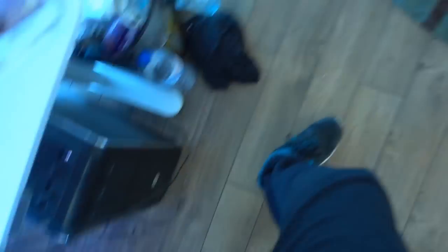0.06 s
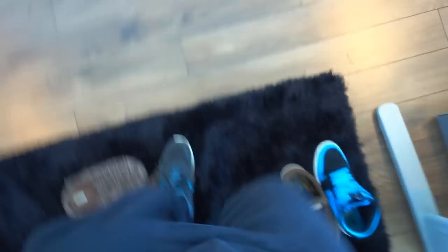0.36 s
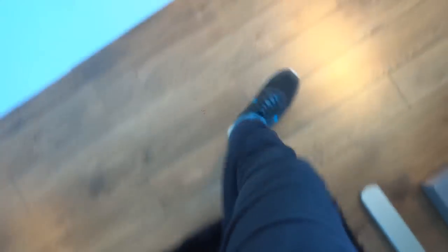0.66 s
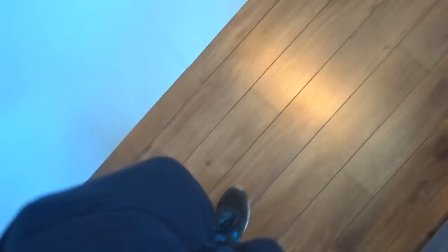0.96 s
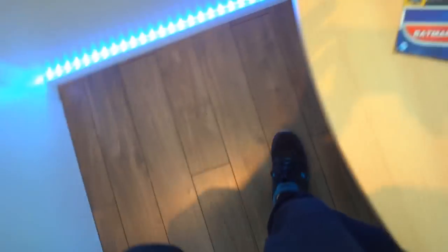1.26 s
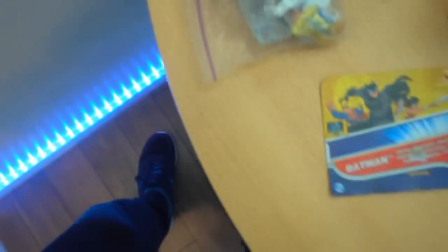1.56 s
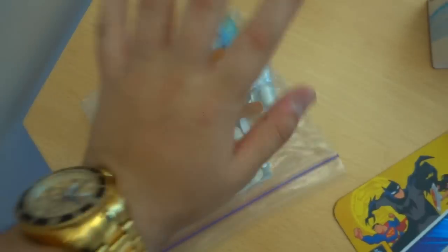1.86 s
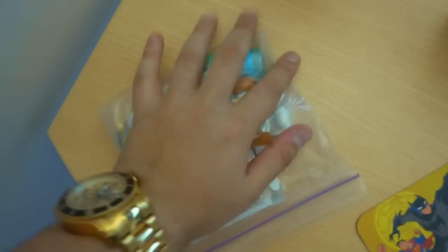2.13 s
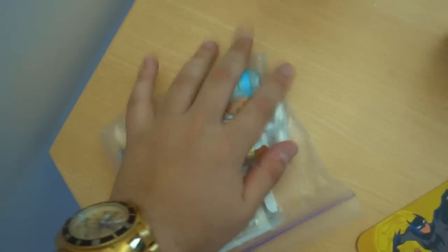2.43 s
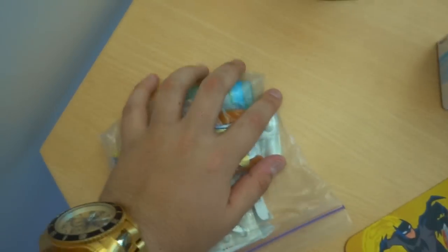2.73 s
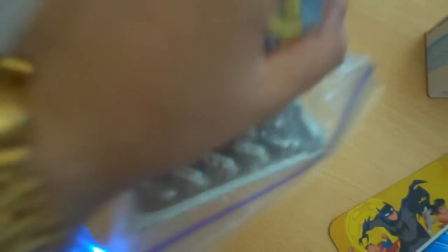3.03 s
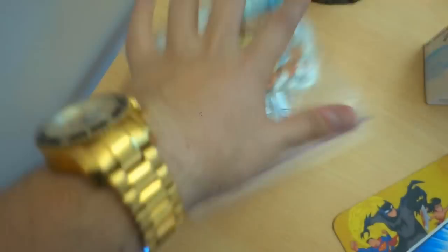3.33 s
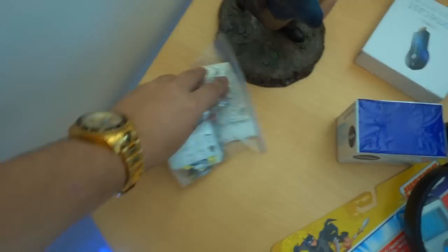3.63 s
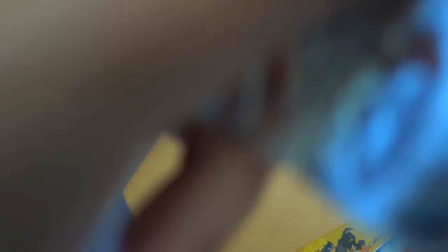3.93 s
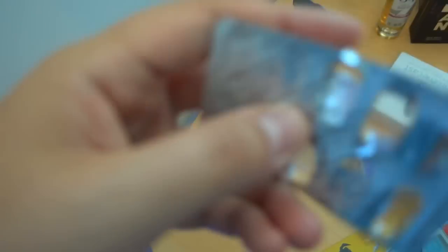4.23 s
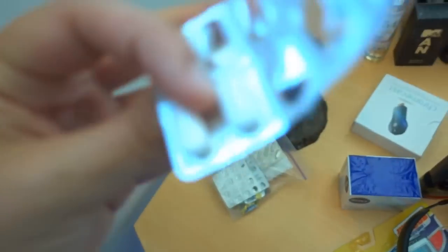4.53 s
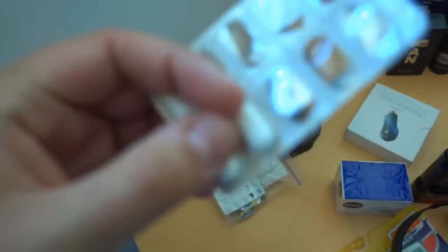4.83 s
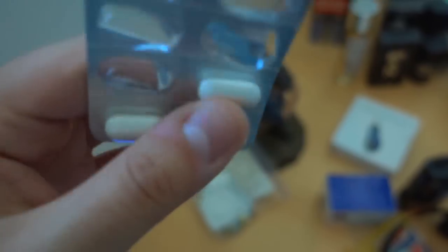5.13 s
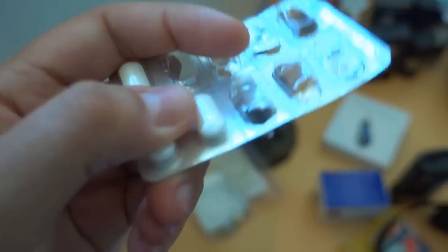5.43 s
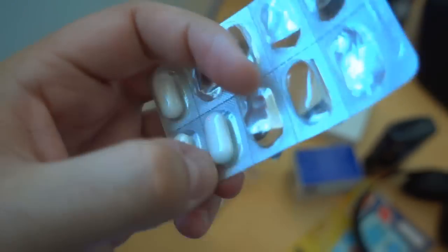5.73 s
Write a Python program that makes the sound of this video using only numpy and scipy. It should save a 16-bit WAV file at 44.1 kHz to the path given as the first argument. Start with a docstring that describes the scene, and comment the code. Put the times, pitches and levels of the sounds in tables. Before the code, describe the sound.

A blister strip of tablets crackles and clicks in someone's fingers, close to the microphone and a little to the left. Before that come a few footsteps on floorboards with rustling trousers, further away, followed by a thin plastic bag being crumpled and dragged on a desk, with low thumps and strips clattering inside. The room is small, with a faint low hush underneath.

```python
"""A blister strip of tablets, turned in the fingers close to a stereo microphone in a small room.
First, further off, shoes cross a wooden floor to a desk: heels thud, soles slap, trousers swish.
A hand paws at a plastic bag of medicine strips; the film crinkles and the desk top booms under it.
Then one strip is pulled out and held near, a little to the left: fingers scrape over the foil,
tablets rattle, and stiff folds and blisters snap through."""
import sys
import numpy as np
from scipy import signal
from scipy.fft import rfft, irfft, next_fast_len
from scipy.io import wavfile
from scipy.ndimage import uniform_filter1d

SR = 44100
rng = np.random.default_rng(int(sys.argv[2]) if len(sys.argv) > 2 else 0)


def inscribe(sig):
    """Save sig as 16-bit PCM at rate SR to the path in sys.argv[1].

    A 1-D sig is mono; a 2-D sig holds one channel per row.
    Samples are clipped to [-1, 1] before scaling.
    """
    pcm = np.round(np.clip(np.atleast_2d(sig).T, -1, 1) * 32767)
    wavfile.write(sys.argv[1], SR, pcm.astype(np.int16))


N = 255118


def amp(db):
    """Decibels to gain."""
    return 10 ** (np.asarray(db) / 20)


def unit(x):
    """Scales to rms 1."""
    return x / np.sqrt(np.mean(x ** 2) + 1e-20)


def read(points, hz):
    """Reads a curve on a log-frequency axis."""
    f, value = np.transpose(points)
    return np.interp(np.log(hz + 1), np.log(f + 1), value)


def clock(length=N):
    """Time of every sample in seconds."""
    return np.arange(length) / SR


def decay(t, t60):
    """Falls by 60 dB in t60 seconds."""
    return np.exp(-np.log(1000) * t / t60)


def add(mix, s, sound):
    """Mixes a sound in at time s."""
    part = mix[:, max(round(s * SR), 0):][:, :sound.shape[1]]
    part += sound[:, :part.shape[1]]


def gain_curves(rows, fade_s=0.011):
    """One gain curve per level column of (t/s, level/dB, ...), silent outside the rows' span."""
    s, *columns = np.transpose(rows)
    gate = np.interp(clock(), [s[0] - fade_s, s[0], s[-1], s[-1] + fade_s], [0, 1, 1, 0])
    return [gate * amp(np.interp(clock(), s, db)) for db in columns]


def stroke(db, rise_s, t60):
    """Envelope that builds up and dies away."""
    t = clock(SR // 2)
    return amp(db) * np.minimum(t / rise_s, 1) * decay(np.maximum(t - rise_s, 0), t60)


def swells(starts, dbs, rises, t60s):
    """Joint envelope of many strokes; a single number holds for all of them."""
    power = np.zeros((1, N))
    for s, *row in zip(*np.broadcast_arrays(starts, dbs, rises, t60s)):
        add(power, s, stroke(*row)[None] ** 2)
    return np.sqrt(power[0])


def steady(x, span_s=0.0114):
    """Holds the short-time power steady, so that a blow's envelope alone sets its strength."""
    power = uniform_filter1d((x ** 2).mean(0), int(span_s * SR) + 1)
    return x / np.sqrt(power.clip(1e-9))


def ring(modes):
    """Dying modes of a struck thing, alike in both channels."""
    t = clock(SR)
    sound = sum(amp(db) * decay(t, t60) * np.sin(2 * np.pi * hz * t) for hz, db, t60 in modes)
    return np.array([sound, sound])


# Stereo width at the microphone: f/Hz, side over mid/dB
WIDTH = [(60, -21), (125, -19), (250, -19), (500, -16), (1000, -11), (2000, -11), (4000, -5), (8000, -2.5),
         (11000, -1.5)]


def colour(pair, spectrum):
    """Shapes mid and side to a spectrum; left and right differ more in the treble."""
    size = next_fast_len(pair.shape[1])
    hz = np.fft.rfftfreq(size, 1 / SR)
    mid, side = rfft(pair, size) * amp(read(spectrum, hz))
    side = side * amp(read(WIDTH, hz))
    return unit(irfft([mid + side, mid - side], size)[:, :pair.shape[1]])


def noise(spectrum, length=N):
    """Smooth stereo noise."""
    return colour(rng.standard_normal((2, length)), spectrum)


def crackle(spectrum, per_s, spread_db, ring_s, bed_db, kinds=32):
    """Countless tiny clicks over a bed of noise; each kind rings in its own way, and a few are large."""
    t = clock(256)
    sizes = amp(spread_db * np.minimum(rng.exponential(1, N), 3)) * rng.choice([-1, 1], N)
    at = np.flatnonzero(rng.random(N) < per_s / SR)
    kind = rng.integers(0, kinds, N)
    rings = rng.standard_normal((kinds, 2, len(t))) * np.exp(-t / ring_s)
    clicks = np.zeros((2, N + len(t)))
    for k in range(len(t)):
        clicks[:, at + k] += sizes[at] * rings[kind[at], :, k].T
    bed = amp(bed_db) * rng.standard_normal((2, N))
    return colour(unit(clicks[:, :N]) + bed, spectrum)


# Reverberation of the small room: f/Hz, t60/s
ROOM_DECAY = [(125, 0.37), (500, 0.2), (2000, 0.42), (5000, 0.31), (11000, 0.25)]
# Reflections off hand, desk and wall: t/s after the direct sound, level/dB
REFLECTIONS = [(.0036, -21), (.0056, -19.5), (.0092, -22), (0.0155, -56)]


def room(x, wet_db, build_s=0.004):
    """The direct sound, a few near reflections, then a diffuse tail that builds up and dies."""
    hz, t, bands = signal.stft(rng.standard_normal((2, SR // 2)), SR, nperseg=256)
    tail = signal.istft(bands * decay(t, read(ROOM_DECAY, hz)[:, None]), SR, nperseg=256)[1]
    tail *= np.minimum(clock(tail.shape[1]) / build_s, 1)
    tail *= amp(wet_db) / np.linalg.norm(tail[0])
    for s, db in REFLECTIONS:
        arrivals = (s * SR * rng.uniform(.96, 1.04, 2)).astype(int)
        tail[[0, 1], arrivals] += amp(db)
    wet = signal.fftconvolve(x, tail, axes=1)[:, :N]
    # long waves reach both capsules alike
    bass_side = signal.sosfilt(signal.butter(1, 520, fs=SR, output="sos"), (wet[0] - wet[1]) / 2)
    return x + wet - np.array([bass_side, -bass_side])


# Room tone, all round the microphone: f/Hz, level/dB
ROOM_TONE = [(25, -4), (60, 3), (130, 10), (300, 8), (1000, 3.5), (3000, -15), (11000, -25)]


def room_tone():
    """A faint, low, even hush."""
    return amp(-51) * noise(ROOM_TONE)


# Rumble of the wooden floor: f/Hz, level/dB
FLOOR_SPECTRUM = [(18, -29), (30, -1), (225, -12.5), (309, 1), (352, -7.5), (386, -39), (423, 4.5),
                  (500, -6), (2500, -17.5), (3250, -64), (5500, -120)]


def floor_rumble(step_times):
    """The floor grumbles after every step."""
    return swells(step_times, dbs=-43, rises=0.018, t60s=1.17) * noise(FLOOR_SPECTRUM)


# A trouser leg brushing past, away from the microphone: t/s at the middle, level/dB, half width/s
LEG_PASSES = [(.197, -38, .008), (.457, -50.5, .012), (.59, -49, 0.046), (.85, -47, 0.098),
              (1.29, -47, 0.015), (1.535, -41, 0.029)]
# Rustle of the cloth: f/Hz, level/dB
CLOTH_SPECTRUM = [(710, -43), (1200, -6), (2980, -5), (3240, -8.5), (3720, -5.5), (4690, -9),
                  (11000, -19.5), (14300, -60), (22000, -120)]


def trousers(thumps, rustle_db=-57.5, jolt_db=-15):
    """Cloth rustles steadily, swishes as a leg passes and is jolted by each dull footfall."""
    brushes = sum(amp(db) / (1 + ((clock() - middle) / half) ** 2) for middle, db, half in LEG_PASSES)
    motion = np.hypot(np.hypot(amp(rustle_db), brushes), amp(jolt_db) * thumps)
    return motion * crackle(CLOTH_SPECTRUM, per_s=900, spread_db=5, ring_s=0.00027, bed_db=1)


# Shoes on the boards, across the room: t/s, sole/dB, heel/dB, scuff/dB, board ring/dB, rise/s, t60/s
FOOTSTEPS = [(.008, -32, -36.5, -51, -33, 0.0083, 0.54), (.594, -34, -62, -39.5, -32, 0.0021, 0.23),
             (0.77, -27, -29, -39, -40, 0.00092, 0.44), (1.226, -22.5, -48, -25.5, -15, .017, 0.24),
             (1.585, -28.5, -23, -27.5, -21.5, 0.008, .11)]
# Dull footfalls on the rug and shifts of weight: t/s, level/dB, rise/s, t60/s
DULL_FOOTFALLS = [(.124, -33.5, 0.014, 0.27), (0.193, -22.5, 0.013, 0.056), (0.353, -26, 0.0012, 0.12),
                  (.714, -40, .005, .14), (1.203, -34.5, .002, .5), (1.285, -27, 0.0025, 0.061),
                  (1.307, -25, 0.0019, .1), (1.378, -40.5, 0.0082, 0.13), (1.624, -32, 0.0018, 0.51)]
# Spectra of heel, sole and scuff: f/Hz, level/dB
SHOE_SPECTRA = {"heel": [(25, -38), (60, -2), (130, 5), (220, 2), (400, -8.5), (1500, -43.5)],
                "sole": [(100, -53), (220, -2.5), (380, 4), (600, 2.5), (1100, -6), (2500, -14.5),
                (8000, -41)], "scuff": [(400, -18), (1200, 10), (2800, 10), (5000, -10), (11000, -61)]}
# Modes of a floorboard: f/Hz, level/dB, t60/s
BOARD_MODES = [(348, -10.5, 0.069), (459, -2.5, 0.095), (505, -4, 0.075), (643, 0, 0.054), (928, -6, 0.051),
               (2280, -26, 0.019)]


def walk(end_s=1.9):
    """Heels thud and soles slap and scuff on the boards, heard with trousers and floor through the room."""
    s, sole_db, heel_db, scuff_db, board_db, rise, t60 = np.transpose(FOOTSTEPS)
    thumps = swells(*np.transpose(DULL_FOOTFALLS))
    heel = steady(noise(SHOE_SPECTRA["heel"])) * np.hypot(swells(s, heel_db, rise, t60), thumps)
    sole = steady(noise(SHOE_SPECTRA["sole"])) * np.hypot(swells(s, sole_db, rise, t60), amp(-6) * thumps)
    for start, db in zip(s + rise, board_db):  # the board rings once the weight is on it
        add(heel, start, amp(db) * ring(BOARD_MODES))
    grit = crackle(SHOE_SPECTRA["scuff"], per_s=1500, spread_db=3, ring_s=.0008, bed_db=-3)
    scuff = steady(grit) * swells(s, scuff_db, rise, t60)
    walking = np.clip((end_s - clock()) / 0.012, 0, 1)
    cloth_and_floor = walking * (trousers(thumps) + floor_rumble(s))
    return room(heel, wet_db=-8.5) + room(sole + scuff + cloth_and_floor, wet_db=-7.5)


# Hand and strips landing on the desk: t/s, thud/dB, thud f/Hz, clatter/dB, boom/dB, t60/s
DESK_BUMPS = [(1.823, -32.5, 218, -26.5, -24.5, 1), (1.981, -20.5, 247, -33, -46, 0.23),
              (2.105, -20, 245, -46, -45, 0.11), (2.202, -19.5, 193, -22, -34, 0.29),
              (2.23, -32, 201, -19.5, -20, 0.23), (2.311, -26, 246, -23.5, -30, 0.21),
              (2.415, -21.5, 195, -25, -21.5, 0.13), (2.518, -19, 298, -19, -42, .11),
              (2.548, -29.5, 225, -26.5, -17.5, 0.31), (2.631, -17, 252, -21.5, -44, 0.064),
              (2.652, -23, 243, -23, -11, 0.26), (3.439, -20, 320, -20, -32, 0.26),
              (3.467, -22, 350, -15.5, -49, 0.11), (3.497, -16.5, 330, -13.5, -55, 0.047),
              (3.523, -26, 303, -24.5, -34, 0.52), (3.837, -16.5, 317, -42, -30, 0.26)]
# Modes of the desk top: f/Hz, level/dB, t60/s
DESK_MODES = [(130.8, 2, 1.17), (123, -14, 1.5), (137.4, -9, 0.9), (229, -16, 0.85)]
# A soft blow: f/multiple of the thud's pitch, level/dB
THUD_SHAPE = [(.1, -35), (.35, -9), (.65, -10), (1, 2.5), (1.4, -8), (2.2, -6), (4, -12), (12, -40)]
# Strips clattering in the bag: f/Hz, level/dB
CLATTER_SPECTRUM = [(150, -30), (350, -7), (560, -4.5), (1050, 2), (2000, 0.5), (3200, -7), (6000, -26),
                    (11000, -62)]
BUMP_RISE_S = 0.0036


def desk():
    """Each bump thuds, rattles the strips in the bag and sets the desk top booming."""
    s, thud_db, thud_hz, clatter_db, boom_db, t60 = np.transpose(DESK_BUMPS)
    rattle = crackle(CLATTER_SPECTRUM, per_s=2000, spread_db=2, ring_s=0.0013, bed_db=-3.5)
    out = amp(1) * steady(rattle) * swells(s, clatter_db, BUMP_RISE_S, t60)
    for k, start in enumerate(s):
        blow = stroke(thud_db[k], BUMP_RISE_S, t60[k])
        spectrum = [(thud_hz[k] * multiple, db) for multiple, db in THUD_SHAPE]
        add(out, start, blow * steady(noise(spectrum, len(blow))))
        add(out, start, amp(boom_db[k] - 5) * ring(DESK_MODES))
    return out


def avalanches(depth_db, span_s):
    """Creases give way in clumps: a gain that flutters at random."""
    flutter = unit(uniform_filter1d(rng.standard_normal(N), int(span_s * SR) + 1))
    return unit(amp(depth_db * flutter))


def moving_fold(x, near_s=0.00027, far_s=0.000869, share=0.38, positions=70):
    """The film reflects its own sound from a fold that keeps moving: hollow colours come and go."""
    delay = np.interp(clock(), np.linspace(0, N / SR, positions), rng.uniform(near_s, far_s, positions))
    echo = np.array([np.interp(clock() - delay, clock(), channel) for channel in x])
    return (x - share * echo) / np.hypot(1, share)


# The hand working the bag on the desk: t/s, crinkle/dB, drag/dB
BAG_HANDLING = [(1.83, -36, -19), (2.06, -27.5, -30.5), (2.17, -41.5, -44.5), (2.26, -38, -24),
                (2.49, -39, -34.5), (2.56, -38, -29), (2.68, -43, -24), (2.83, -40, -38), (2.9, -27, -38.5),
                (3.02, -24.5, -35), (3.19, -39.5, -44), (3.32, -41.5, -43), (3.39, -21, -29.5),
                (3.6, -27.5, -36), (3.76, -26.5, -40.5), (3.89, -28, -34), (3.97, -32, -48),
                (4.05, -46, -36)]
# Handfuls of film giving way in the air: t/s, level/dB, t60/s
FILM_CRUNCHES = [(2.873, -27, .17), (3.078, -26, 0.031), (3.346, -20, 0.027), (3.378, -22, 0.59),
                 (3.668, -27, 0.49), (3.784, -30, 0.77), (3.914, -20, 0.15)]
# Crinkling film: f/Hz, level/dB
FILM_SPECTRUM = [(530, -23), (900, -5.5), (1260, -5.5), (1430, -7), (1850, -2), (2310, -3), (3370, -2),
                 (6720, -8.5), (9500, -11.5), (11000, -15.5), (14300, -85), (22000, -120)]
# The bag dragging over the desk top: f/Hz, level/dB
DRAG_SPECTRUM = [(30, -7), (80, -5.5), (130, 2.5), (260, -1), (450, 2.5), (700, -0.5), (1100, 0),
                 (1800, -5), (2800, -4.5), (5000, -11), (11000, -23)]


def bag():
    """Thin film crinkles under the hand, bursts when it gives way or is bumped, and drags on the desk."""
    crinkle, drag = gain_curves(BAG_HANDLING)
    film = crackle(FILM_SPECTRUM, per_s=1300, spread_db=5.5, ring_s=.0005, bed_db=-10)
    crush = crackle(FILM_SPECTRUM, per_s=2500, spread_db=4, ring_s=.0007, bed_db=-10)
    slide = crackle(DRAG_SPECTRUM, per_s=1500, spread_db=4, ring_s=0.0013, bed_db=-11)
    s, db, t60 = np.transpose(FILM_CRUNCHES)
    crunched = swells(s, db, rises=0.0036, t60s=t60)
    bump_s, thud_db, *_, bump_t60 = np.transpose(DESK_BUMPS)
    crush_db = np.minimum(thud_db + 1, -18)  # the film gives way only so far
    bumped = swells(bump_s, crush_db, BUMP_RISE_S, 0.51 * bump_t60)
    bursts = amp(4.5) * steady(crush) * np.hypot(crunched, bumped)
    rustle = amp(0.5) * crinkle * film * avalanches(depth_db=2.5, span_s=0.012)
    return moving_fold(rustle + bursts) + amp(2) * drag * slide


# First instant of a snap, heard close: f/Hz, level/dB
CRACK_SPECTRUM = [(100, -43), (800, -21), (2000, -8.5), (3200, 3.5), (6000, 0.5), (9000, 0), (11000, -3)]


def snap(db, hz, crack_db, crack_s=0.0016, t60_cycles=36, glide=0.028, settle_s=0.00067):
    """A stiff part flips or clicks: a sharp crack, then three brief modes that sag in pitch."""
    t = clock(1024)
    phase = 2 * np.pi * hz * (t + glide * settle_s * (1 - np.exp(-t / settle_s)))
    lead = np.array([[.5], [-.5]]) * rng.uniform(.3, 1.5)  # the capsules hear it slightly out of step
    second = amp(-8) * np.sin(phase * rng.uniform(0.88, 1.337) - lead)
    third = amp(-16) * np.sin(phase * rng.uniform(1.79, 1.9) + 2 * lead)
    envelope = decay(t, t60_cycles / hz) * np.minimum(t / 0.0002, 1)
    ringing = (np.sin(phase + lead) + second + third) * envelope
    crack = colour(rng.standard_normal((2, len(t))) * np.exp(-t / crack_s), CRACK_SPECTRUM)
    crack *= np.sqrt(crack_s / 2 / t[-1]) * (t < t[-1] / 2)
    return amp(db) * (ringing + amp(crack_db + 2.5) * crack) / np.hypot(1, amp(crack_db))


# Clicks from the clothes: t/s, level/dB, crack balance/dB
FITTING_TICKS = [(.073, -14.5, 25), (0.919, -31, -15), (1.026, -28.5, -10), (1.305, -14.5, 14)]


def fittings():
    """Small hard fittings on the clothes tick."""
    out = np.zeros((2, N))
    for s, db, crack_db in FITTING_TICKS:
        add(out, s, snap(db, hz=5480, crack_db=crack_db, crack_s=0.00013))
    return out


# Tablets rattling near the microphone: t/s, level/dB
TABLET_KNOCKS = [(4.302, -22.5), (4.333, -21.5), (4.342, -16.5), (4.382, -25)]
# Modes of a tablet in its blister: f/Hz, level/dB, t60/s
TABLET_MODES = [(1040, 1, 0.018), (1630, -8, 0.016)]


def tablets():
    """Tablets knock hollowly in their blisters."""
    out = np.zeros((2, N))
    for s, db in TABLET_KNOCKS:
        add(out, s, amp(db) * ring(TABLET_MODES))
    return out


# Fingers sliding on the strip, close up: t/s, scrape/dB, thud/dB, rise/s, t60/s
FINGER_RUBS = [(4.15, -31, -49, 0.019, .25), (4.294, -25.5, -42, 0.0018, .14),
               (4.533, -22.5, -37.5, 0.018, 0.042), (4.72, -30.5, -45, 0.023, 0.53),
               (4.753, -19, -49, 0.035, 0.05), (4.908, -25, -41.5, 0.002, 0.14),
               (5.057, -23.5, -28, 0.0087, 0.082), (5.172, -28.5, -40, 0.0035, 0.22),
               (5.205, -38, -41.5, 0.022, 0.16), (5.346, -24, -40.5, 0.035, 0.17),
               (5.511, -24, -39, 0.0036, 0.031), (5.648, -36, -63, 0.015, 0.12)]
# Light crackle of the held foil: t/s, level/dB
FOIL_GRIP = [(4.0, -24.5), (4.11, -31), (4.2, -31), (4.26, -60), (4.36, -35), (4.58, -33.5), (4.69, -46.5),
             (5.1, -32.5), (5.26, -46.5), (5.42, -24.5), (5.78, -43)]
# Scraped foil: f/Hz, level/dB
FOIL_SPECTRUM = [(120, -46), (200, -26), (595, -8.5), (860, -3), (1520, -6), (2350, -1.5), (2650, -2.5),
                 (3890, -3.5), (5440, -7), (7740, -9.5), (11000, -12.5), (14300, -56), (22000, -120)]
# Thud through the hand: f/Hz, level/dB
HAND_SPECTRUM = [(30, -13), (75, 1), (160, -5), (420, -7.5), (900, -55), (3000, -56)]


def strip_rubs():
    """Fingers stick and slip over the foil and jog the hand that holds it."""
    s, scrape_db, thud_db, rise, t60 = np.transpose(FINGER_RUBS)
    slips = crackle(FOIL_SPECTRUM, per_s=1300, spread_db=4.5, ring_s=.0007, bed_db=-7)
    foil = crackle(FOIL_SPECTRUM, per_s=350, spread_db=10.5, ring_s=0.00042, bed_db=-4)
    scrapes = steady(slips) * swells(s, scrape_db, rise, t60)
    thuds = steady(noise(HAND_SPECTRUM)) * swells(s, thud_db, rise, t60)
    grip = gain_curves(FOIL_GRIP)[0] * foil
    return amp(1.5) * scrapes + amp(-1) * thuds + amp(-5) * grip


# Folds and blisters popping through, close to the microphone: t/s, level/dB, f/Hz, crack balance/dB
BLISTER_SNAPS = [(2.8769, -5.5, 4020, -13), (2.9295, -9.5, 2670, -1), (3.0051, -8, 3380, -14),
                 (3.1372, -7, 3710, -3.5), (3.2879, -18, 3980, 0), (3.347, -8.5, 2590, -15),
                 (3.3633, -12, 2600, 4), (3.7582, -10, 2900, -1), (3.9564, -5, 8600, -10),
                 (3.962, -7, 4280, -3), (3.9864, -13, 4490, 6), (3.997, -9, 2830, 8),
                 (4.0218, -7, 4360, -3), (4.0887, -10, 2530, 3), (4.125, -8.5, 3770, -1),
                 (4.2086, -11, 5960, -1), (4.2239, -8.5, 2860, 0), (4.2889, -4.5, 3600, -8),
                 (4.2962, -9.5, 2930, 3), (4.3231, -7.5, 4350, -10), (4.354, -6.5, 3800, -5.5),
                 (4.4091, -4.5, 4330, -6.5), (4.5066, -6.5, 4860, -3.5), (4.5646, -8.5, 3700, 4),
                 (4.6737, -11.5, 4400, -1.5), (4.7129, -7, 8600, -8), (4.7283, -12, 3700, 5),
                 (4.7588, -8, 3660, -18), (4.785, -8.5, 3050, -18), (4.9093, -13, 6160, -3),
                 (4.9237, -5.5, 8500, -19), (4.929, -9.5, 7300, -8), (4.9756, -12.5, 5740, 11),
                 (4.9898, -8.5, 4220, -16), (5.017, -6, 4010, -11), (5.0941, -9, 6250, -7.5),
                 (5.1615, -5, 6050, -14), (5.1805, -6, 3700, 1), (5.1963, -6, 8260, -5),
                 (5.2287, -4.5, 7700, -8), (5.2357, -7, 4620, -10), (5.2579, -5.5, 8150, -8.5),
                 (5.2918, -9, 3400, 6), (5.3359, -4, 4440, -5.5), (5.4008, 1.5, 5930, -12),
                 (5.4271, -5.5, 4630, -1), (5.469, -9.5, 4900, -5), (5.5129, -14, 3320, -11),
                 (5.5536, -5.5, 4320, -9), (5.5735, -7, 4660, -7), (5.6473, -12.5, 5500, 4),
                 (5.6795, -5.5, 6600, -4), (5.7326, -8.5, 3950, -9), (5.768, -12.5, 3370, -9)]


def strip_snaps(gain_db=-2, lag_s=0.00066):
    """Stiff folds and domed blisters flip one by one."""
    out = np.zeros((2, N))
    for s, db, hz, crack_db in BLISTER_SNAPS:
        add(out, s + lag_s, snap(db + gain_db, hz, crack_db))
    return out


def scene():
    """From one microphone position: the far feet, the bag on the desk and the near strip."""
    near = room(strip_snaps(), wet_db=-8)
    near += room(strip_rubs() + tablets() + fittings(), wet_db=-17.5)
    near *= amp([[.4], [-.4]])  # a little to the left
    return walk() + room(bag() + desk(), wet_db=-11) + near + room_tone()


def record(dry, ceiling=.8, cutoff_hz=11180):
    """The recorder rounds off the loudest peaks, then cuts the top of the treble."""
    soft = ceiling * np.tanh(dry / ceiling)
    lowpass = signal.firwin(301, cutoff_hz, window=("kaiser", 7), fs=SR)
    return signal.oaconvolve(soft, lowpass[None], "same")


dry = scene()
out = record(dry)
inscribe(out)
```